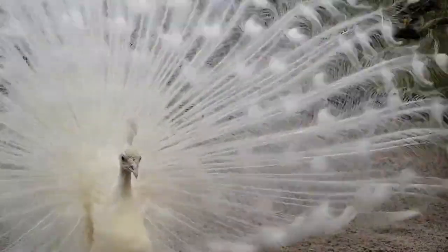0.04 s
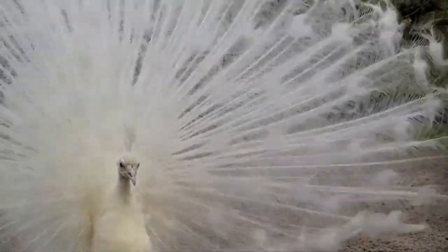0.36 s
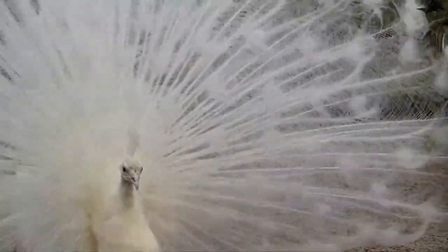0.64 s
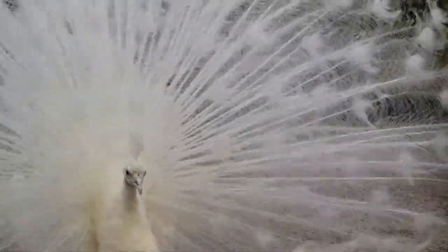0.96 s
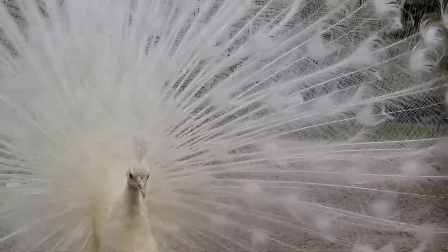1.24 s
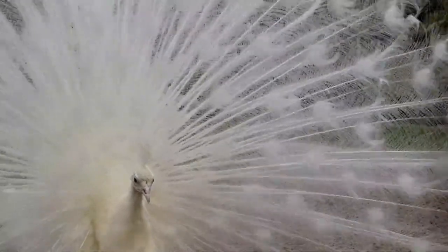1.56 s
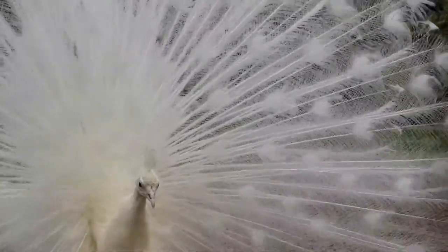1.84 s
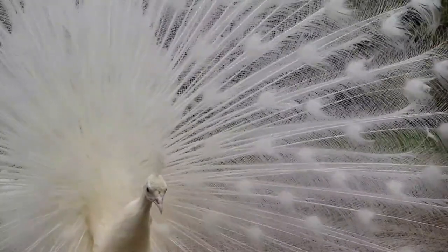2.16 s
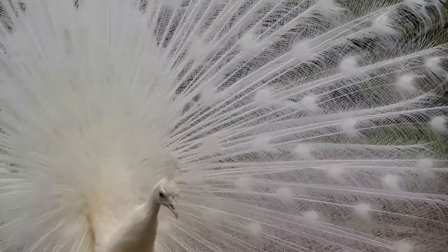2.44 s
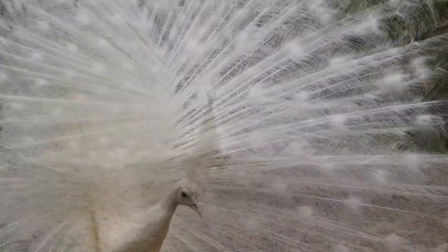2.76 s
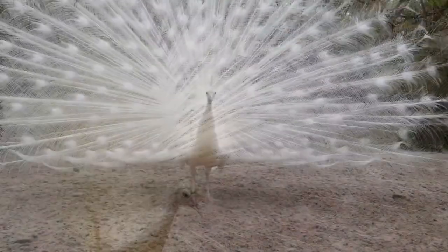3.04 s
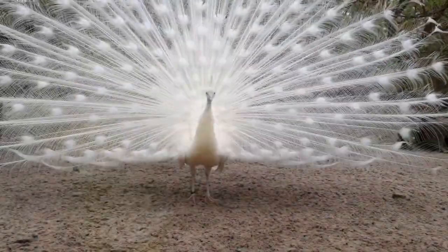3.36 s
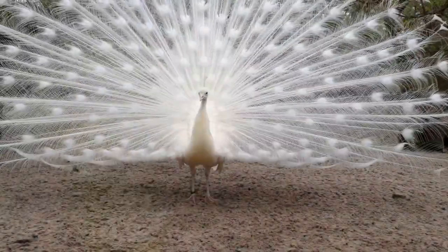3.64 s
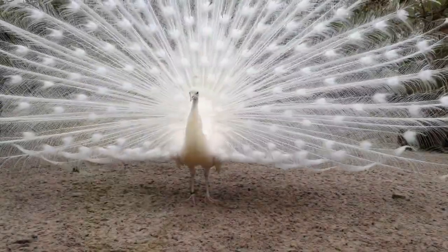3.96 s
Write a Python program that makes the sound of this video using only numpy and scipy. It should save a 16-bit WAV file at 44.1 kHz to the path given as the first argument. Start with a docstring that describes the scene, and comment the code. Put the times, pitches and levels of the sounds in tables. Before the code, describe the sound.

A peacock shakes its tail feathers close by, a rapid ticking rustle with sharp quill clicks and a low flutter of air, strongest at first and dying away by about 2 seconds. Small birds chirp faintly around the outdoor pen. At 2.7 seconds one gives a short falling whistle nearby. From 3 seconds the background changes to busier chirping over a soft, low, wavering drone.

```python
"""A dense, ticking rustle close to the microphones: a peacock shivers its spread train in an outdoor pen.
Barbs tick and rub, quills clash in short bursts and the fan pushes the air in a low flutter, then it
comes to rest. Small birds chirp around the pen and one whistles close by. After three seconds the
scene cuts to a livelier spot with more birds and a low drone."""
import sys
import numpy as np
from scipy import signal
from scipy.fft import rfft, irfft
from scipy.io import wavfile
from scipy.ndimage import uniform_filter1d

SR = 44100
rng = np.random.default_rng(int(sys.argv[2]) if len(sys.argv) > 2 else 0)


def generate_wav(signal):
    """Clip the signal to [-1, 1] and save it as 16-bit WAV at the path in sys.argv[1]."""
    frames = np.transpose(np.atleast_2d(signal))
    scaled = np.clip(frames, -1, 1) * 32767
    pcm = np.round(scaled).astype(np.int16)
    wavfile.write(sys.argv[1], SR, pcm)


N = 176400
T = np.arange(N) / SR
CUT_S = 3.015  # from the pen to the livelier spot

# The train's rustle, close up. Each row: time in seconds, relative level in dB.
RUSTLE = [(0, -57), (.15, -48), (.3, -51), (.42, -51.5), (.52, -55.5), (.66, -54.5), (.74, -54.5),
          (.88, -53), (1.01, -56), (1.17, -54), (1.24, -57.5), (1.42, -56), (1.5, -55), (1.66, -55),
          (1.83, -57), (1.95, -64), (2.05, -67.5), (2.2, -77.5)]
# Quills striking. Each row: peak time in seconds, relative level in dB, half length in seconds.
QUILL_CLASHES = [(0.035, -39.5, 0.0027), (0.086, -45.5, 0.0042), (.143, -37.5, 0.0016),
                 (0.303, -49, 0.0064), (.349, -39.5, 0.0038), (0.359, -39.5, 0.0055), (0.457, -42, 0.0086),
                 (0.568, -41, 0.0022), (.6255, -40.5, 0.0019), (0.673, -42.5, 0.0034),
                 (0.775, -43, 0.00076), (.783, -49, .001), (0.877, -47.5, 0.0048), (0.945, -47, 0.0015),
                 (0.993, -51, 0.0063), (1.041, -55, 0.0018), (1.086, -47, 0.0071), (1.198, -49, 0.0059),
                 (1.269, -50.5, 0.0026), (1.354, -49, 0.0016), (1.368, -47.5, 0.0059), (1.455, -48, 0.0011),
                 (1.469, -46.5, 0.0059), (1.499, -51.5, 0.0074), (1.559, -45.5, 0.0017),
                 (1.744, -46, 0.0013), (1.811, -55.5, .005), (1.858, -57.5, 0.0076), (1.952, -57, 0.004)]
# Colours of the three feather parts. Each row: frequency in Hz, relative level in dB.
BARB_COLOUR = [(300, -29), (1200, -10.5), (2500, -5.5), (4500, -5.5), (6300, -0.5), (7600, 4.5), (9200, 0),
               (11000, 2.5), (13500, -2), (16000, -5)]
SHAFT_COLOUR = [(150, 1), (340, -4), (520, -8.5), (820, 0.5), (1150, -10.5), (1700, 3), (2050, 4.5),
                (2350, -1), (2700, 4.5), (3500, 4.5), (5000, 0.5), (7000, -4), (12000, -27)]
QUILL_COLOUR = [(300, -22.5), (1500, -5.5), (3000, -6), (6000, 0.5), (7600, 0.5), (13000, 2), (16000, -7)]
# The fan at the two microphones. Each row: frequency in Hz, then, table by table,
# left-right likeness from 0 to 1, left minus right in dB, the left's phase lead in radians.
FAN_LIKENESS = [(6000, .55), (7000, .89)]
FAN_BALANCE = [(200, 5.6), (700, 0.5), (1290, 7.7), (2380, 2.4), (4400, 0.93), (8000, 0.45), (15000, 1.6)]
FAN_PHASE = [(1700, .5), (4100, 2.5), (6100, 4), (6700, -1)]
def train(shakes_per_s=25, settle_s=.009):
    """Close by, bright barbs and duller shafts tick with each shake; quills clash and settle."""
    turns = np.cumsum(shakes_per_s * (1 + .05 * drift(4))) / SR
    shake = amp(1.2 * np.sin(2 * np.pi * turns) + 1.06 * drift(45))
    power = np.zeros(N)
    for s, db, half in QUILL_CLASHES:
        width = np.where(T < s, .6 * half, half)  # rises faster than it falls
        settle = amp(-8) * (T > s) * np.exp(-abs(T - s) / settle_s)
        power += amp(db) ** 2 * (np.exp(-.5 * ((T - s) / width) ** 2) + settle ** 2)
    clash, rustle = np.sqrt(power), amp(curve(RUSTLE)) * shake
    place = per_bin(FAN_LIKENESS), per_bin(FAN_BALANCE), per_bin(FAN_PHASE)
    quills = amp(-2) * clash * shifting(coloured(ticks(), QUILL_COLOUR, *place))
    barbs = amp(-3) * rustle * coloured(ticks(), BARB_COLOUR, *place)
    shaft_gain = np.hypot(amp(-2.5) * rustle * (T < CUT_S), amp(-7) * clash)
    shafts = shaft_gain * coloured(ticks(), SHAFT_COLOUR, *place)
    return quills + shifting(barbs + shafts)


def ticks(per_s=7000, spread_db=3.2):
    """Feathers touch in dense tiny clicks, a few of them large."""
    size = amp(spread_db * np.minimum(rng.exponential(1, (2, N)), 4.5))
    return np.sign(noise()) * size * (rng.random((2, N)) < per_s / SR)


def shifting(x, depth_db=2.5, patch_hz=700, patch_s=.025, size=128):
    """Other feathers touch from moment to moment, so the colour shifts in patches."""
    spectra = signal.stft(x, nperseg=size)[2]
    patches = rng.standard_normal(spectra.shape[1:])
    patches = uniform_filter1d(patches, round(patch_hz * size / SR), axis=0)
    patches = unit(uniform_filter1d(patches, round(2 * patch_s * SR / size), axis=1))
    return signal.istft(spectra * unit(amp(depth_db * patches)), nperseg=size)[1][:, :N]


# Air pushed by the fan. Each row: time in seconds, level in dB.
FLUTTER_LEVEL = [(0, -53), (.55, -57), (.85, -56.5), (1.1, -55), (1.5, -56.5), (1.85, -57.5), (2.1, -70)]
# Its colour. Each row: frequency in Hz, relative level in dB.
FLUTTER_SPECTRUM = [(20, -28), (30, -25), (42, -2), (60, 0.5), (95, 3), (160, -7.5), (280, -19.5),
                    (450, -43.5), (1000, -61)]
def flutter():
    """The shaking fan pushes air at the microphones, a little left of centre."""
    air = coloured(noise(), FLUTTER_SPECTRUM, likeness=1, left_db=2.1)
    return amp(curve(FLUTTER_LEVEL)) * (T < CUT_S) * air


# One bird, close on the left. Each row: time in seconds, pitch in Hz, level in dB.
FALLING_WHISTLE = [(2.625, 5420, -70), (2.637, 5530, -61), (2.69, 5067, -53), (2.716, 5030, -33.5),
                   (2.724, 5006, -37.5), (2.732, 4970, -31), (2.741, 4926, -29), (2.749, 4894, -36.5),
                   (2.754, 4860, -65)]
def whistler(octave_s=2.68, octave_half_s=.021):
    """A whistle slides down, swells and stops short; a faint husky octave colours its start."""
    hz = curve(FALLING_WHISTLE)
    gate = uniform_filter1d(1. * (T > FALLING_WHISTLE[0][0]) * (T < FALLING_WHISTLE[-1][0]), size=150)
    octave = tone(2 * hz * (1 + .007 * drift(500)))
    octave *= amp(-63.5) * np.exp(-.5 * ((T - octave_s) / octave_half_s) ** 2)
    whistle = amp(curve(FALLING_WHISTLE, 2)) * tone(hz, lead=-.78)
    direct = gate * (whistle + octave) * pan(left_db=4.5)
    return direct + amp(-20.5) * pen_echo(direct)


# Small birds around both spots. Each row: start and length in seconds, pitch in Hz at the start,
# middle and end, level in dB, echo in dB relative to the note.
BIRD_NOTES = [(0.111, 0.053, 3690, 3480, 3500, -57.5, -6), (0.138, .035, 3410, 2910, 2600, -63, 1),
              (.412, 0.034, 3990, 3210, 2480, -56, -2), (0.444, 0.047, 2610, 2560, 2670, -58.5, 0.5),
              (0.896, 0.048, 3324, 3350, 3443, -49.5, -5), (1.038, 0.028, 3220, 3347, 3540, -53, -3),
              (1.199, 0.026, 3070, 2970, 3250, -56.5, 2), (1.226, 0.028, 3230, 3380, 3480, -49, -8),
              (1.338, 0.058, 3350, 3430, 3540, -47.5, -6), (2.291, .042, 3530, 3430, 3540, -70.5, -5),
              (2.337, 0.047, 3080, 3070, 3090, -74, -1), (2.907, 0.025, 4220, 4156, 4030, -51.5, -6.5),
              (2.927, 0.027, 4320, 4430, 4430, -55, -21), (3.015, 0.033, 3230, 3246, 3307, -55.5, 6),
              (3.087, 0.018, 4130, 4220, 4470, -58.5, 10), (3.097, 0.031, 3630, 3492, 3960, -59, 7.5),
              (3.183, 0.012, 3610, 3780, 3680, -48, 1), (3.186, 0.078, 4970, 5030, 4940, -59, 0.5),
              (3.259, 0.069, 5620, 5520, 5170, -52.5, -3), (3.335, .05, 5940, 5940, 5450, -59.5, 0),
              (3.369, 0.101, 2516, 2680, 2530, -66.5, -5.5), (3.409, 0.021, 5990, 4655, 3870, -54, 2),
              (3.467, 0.098, 3297, 3265, 3203, -50, -3), (3.484, 0.03, 4380, 3963, 4140, -53.5, 1.5),
              (3.568, 0.035, 5090, 5010, 5000, -58.5, -3), (3.599, 0.015, 3730, 3860, 4370, -53, 2),
              (3.654, 0.027, 3640, 4010, 4220, -65, 6), (3.707, 0.034, 3623, 3680, 3630, -57.5, -0.5),
              (3.708, 0.028, 4534, 3825, 2880, -56.5, 1), (3.779, 0.053, 4994, 4995, 4980, -54, -3.5),
              (3.815, 0.024, 3640, 3700, 2980, -54.5, 0.5), (3.931, 0.039, 3580, 3910, 4130, -55.5, 2.5),
              (3.515, .06, 8570, 8600, 8650, -73, -4), (3.69, .075, 8780, 8480, 8600, -74.5, -3),
              (3.875, 0.073, 7700, 7470, 7500, -68, -4), (3.947, 0.015, 3700, 3150, 3020, -56, -5)]
def birds(rise_s=.0056, fall_s=.0074):
    """Short wavering near-sine chirps, each ringing on in the pen."""
    direct, to_echo = np.zeros((2, 2, N))
    waver, flicker = drift(148.5), amp(2.5 * drift(77))
    for s, length, start_hz, middle_hz, end_hz, db, echo_db in BIRD_NOTES:
        t = np.arange(0, length, 1 / SR)
        at = (round(s * SR) + np.arange(len(t))) % N
        hz = np.polyval(np.polyfit([0, .5, 1], [start_hz, middle_hz, end_hz], 2), t / length)
        depth = .0046 + .06 * abs(end_hz - start_hz) / middle_hz  # wide glides waver more
        hz *= 1 + depth * waver[at]
        shape = np.minimum(t / rise_s, 1) * np.minimum((length - t) / fall_s, 1) * flicker[at]
        note = amp(db) * shape * tone(hz, lead=1.3 if s > CUT_S else -.65) * pan(left_db=2)
        add(direct, s, note)
        add(to_echo, s, amp(echo_db) * note)
    return direct + pen_echo(to_echo)


# The drone at the second spot. Each row: time in seconds, level in dB.
DRONE_SWELLS = [(3.04, -68), (3.13, -57), (3.27, -54.5), (3.4, -70), (3.52, -51.5), (3.64, -55.5),
                (3.75, -67), (3.82, -51), (4, -55.5)]
def drone(hz=52.7):
    """A low wavering tone swells three times, louder in the left microphone."""
    fade_in = np.clip((T - CUT_S) / .02, 0, 1)
    return fade_in * amp(curve(DRONE_SWELLS)) * tone(hz * (1 + .033 * drift(14))) * pan(left_db=5)


# Birds far from the microphones. Each row: time in seconds, level in dB.
TWITTER_LEVEL = [(0, -67), (2.09, -69.5), (2.18, -69), (2.28, -74.5), (2.43, -70.5), (2.62, -68),
                 (2.74, -61), (2.9, -62.5), (3.01, -70), (3.25, -86), (3.42, -57.5), (3.6, -71), (4, -91)]
# Their colour. Each row: frequency in Hz, relative level in dB.
TWITTER_SPECTRUM = [(2200, -28), (3200, -8), (4200, 4.5), (5400, 5.5), (6500, -3)]
def far_birds(chips_per_s=150, chip_s=.0161):
    """Many quick falling chips arrive mostly as echo and blur into a twitter."""
    gain = amp(curve(TWITTER_LEVEL) + 1.7 * drift(24))
    chips, t = np.zeros((2, N)), np.arange(0, chip_s, 1 / SR)
    for when, pitch, side in rng.random((int(chips_per_s * N / SR), 3)):
        hz = (3300 + 4000 * pitch) * (1 - .252 * t / chip_s)
        add(chips, when * N / SR, np.hanning(len(t)) * tone(hz, lead=np.pi * (2 * side - 1)))
    blur = .33 * chips + pen_echo(chips)
    return gain * coloured(blur, TWITTER_SPECTRUM, likeness=.033, left_db=3.7)


# Open air at the pen and at the second spot. Each row: frequency in Hz, relative level in dB.
PEN_AIR = [(20, -30), (40, -1.5), (95, -0.5), (160, -9.5), (230, -19.5), (400, -34), (1500, -44.5),
           (2600, -45.5), (5000, -42.5), (8000, -54), (16000, -41)]
SECOND_SPOT_AIR = [(20, 0), (50, -5), (85, 3), (130, -2.5), (200, -5), (600, -17), (1000, -20),
                   (2200, -22.5), (4000, -14.5), (7000, -29.5), (16000, -31)]
# The air at the two microphones. Each row: frequency in Hz, then left-right likeness from 0 to 1
# in the first table, left minus right in dB in the second.
AIR_LIKENESS = [(60, 1), (130, 0.84), (300, 0.35), (1000, 0.18), (6000, 1)]
AIR_BALANCE = [(60, 3.5), (200, 1.5), (16000, -1.5)]
def open_air():
    """Steady outdoor rumble and hiss, switching from one spot to the other at the cut."""
    after = np.clip((T - CUT_S) / .0043, 0, 1)
    place = per_bin(AIR_LIKENESS), per_bin(AIR_BALANCE)
    first = amp(-57.5) * coloured(noise(), PEN_AIR, *place)
    second = amp(-59.5) * coloured(noise(), SECOND_SPOT_AIR, *place)
    return (1 - after) * first + after * second


def pen_echo(x, t60_s=.9, delay_s=.01):
    """Scattered reflections from the enclosure, different at each microphone."""
    t = T[:SR]
    tail = rng.standard_normal((2, SR)) * (rng.random((2, SR)) < .06)
    tail *= amp(-60 * t / t60_s) * (t > delay_s)
    tail /= np.linalg.norm(tail, axis=1, keepdims=True)
    return signal.fftconvolve(x, tail, axes=1)[:, :N]


def tone(hz, lead=0):
    """A sine following a pitch curve; the left microphone leads by `lead` radians."""
    phase = 2 * np.pi * np.cumsum(hz) / SR
    return np.sqrt(2) * np.sin(phase + np.array([[.5], [-.5]]) * lead)


def coloured(pair, colour, likeness, left_db, lead=0):
    """Gives two unrelated signals a spectrum and a place between the microphones, at rms 1."""
    left, other = rfft(pair)
    right = (likeness * left + np.sqrt(1 - likeness ** 2) * other) * np.exp(-1j * lead)
    return unit(irfft(np.array([left, right]) * amp(per_bin(colour)) * pan(left_db), N))


def amp(db):
    """Decibels to gain."""
    return 10 ** (np.asarray(db) / 20)


def unit(x):
    """Scales to rms 1."""
    return x / np.sqrt(np.mean(x ** 2) + 1e-20)


def curve(points, column=1):
    """A table over time, at every sample."""
    rows = np.array(points)
    return np.interp(T, rows[:, 0], rows[:, column])


def per_bin(points):
    """A table over log frequency, at every bin."""
    hz, value = np.transpose(points)
    return np.interp(np.log(np.fft.rfftfreq(N, 1 / SR) + 1), np.log(hz), value)


def drift(rate_hz):
    """Random wander of rms 1, mostly below rate_hz."""
    rolloff = 1 + (np.fft.rfftfreq(N, 1 / SR) / rate_hz) ** 4
    return unit(irfft(rfft(rng.standard_normal(N)) / rolloff, N))


def pan(left_db):
    """Channel gains, the left louder by left_db."""
    return amp(np.array([[.5], [-.5]]) * left_db)


def noise():
    """Two channels of white noise."""
    return rng.standard_normal((2, N))


def add(mix, s, sound):
    """Mixes a sound in at s seconds."""
    part = mix[:, round(s * SR):][:, :sound.shape[1]]
    part += sound[:, :part.shape[1]]


def scene():
    """The peacock in front, small birds around it, the drone and open air behind."""
    return train() + flutter() + whistler() + birds() + drone() + open_air() + far_birds()


def record(dry, edge_hz=15900):
    """The recorder cuts off the highest treble."""
    lowpass = signal.firwin(511, edge_hz, window=("kaiser", 9), fs=SR)
    return signal.oaconvolve(dry, lowpass[None], "same")


dry = scene()
out = record(dry)
generate_wav(out)
```